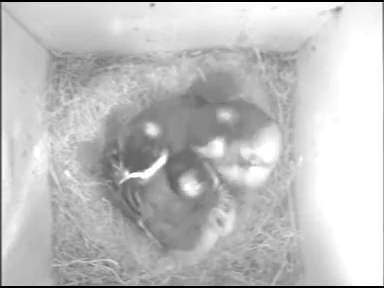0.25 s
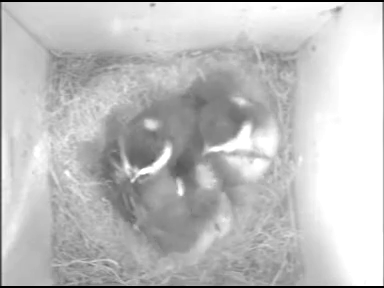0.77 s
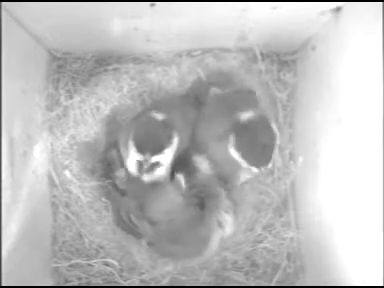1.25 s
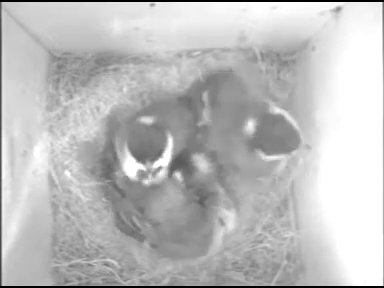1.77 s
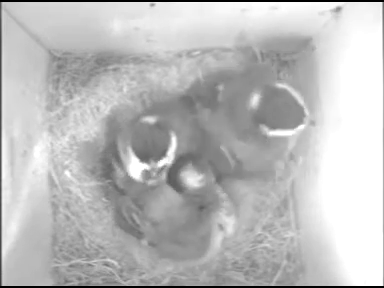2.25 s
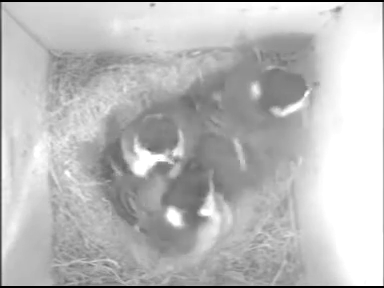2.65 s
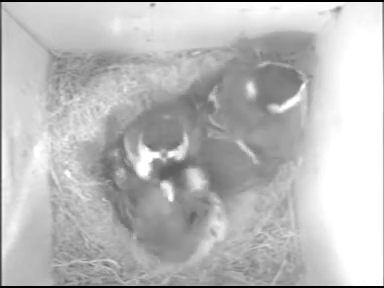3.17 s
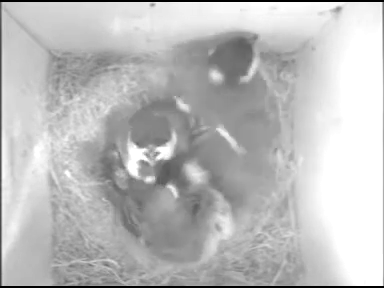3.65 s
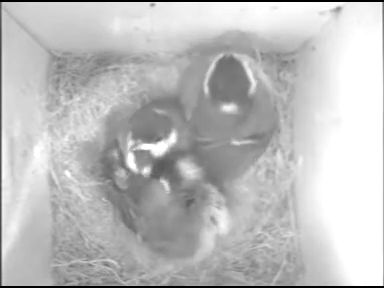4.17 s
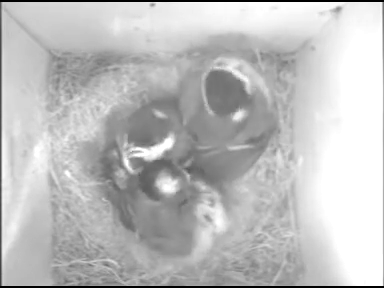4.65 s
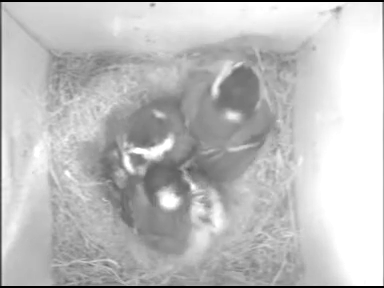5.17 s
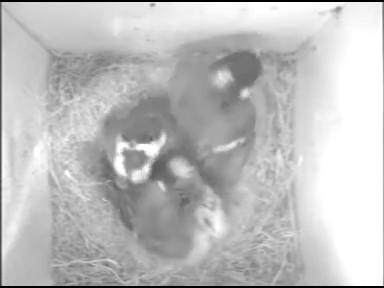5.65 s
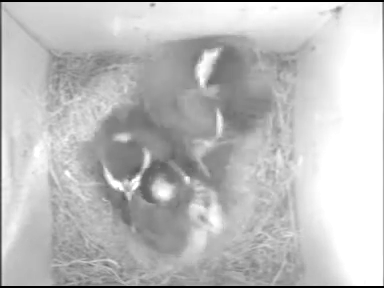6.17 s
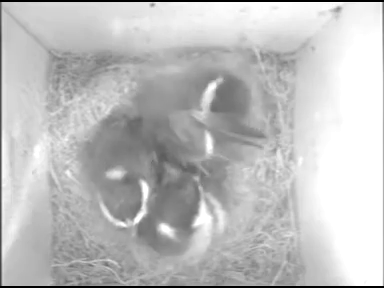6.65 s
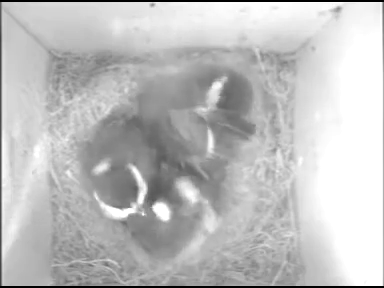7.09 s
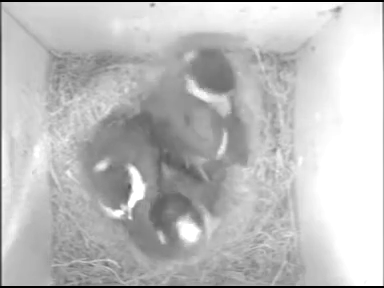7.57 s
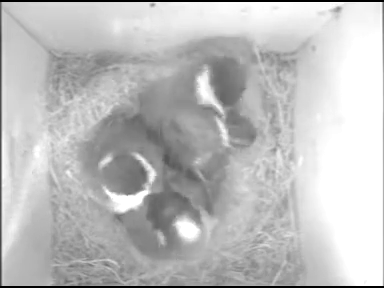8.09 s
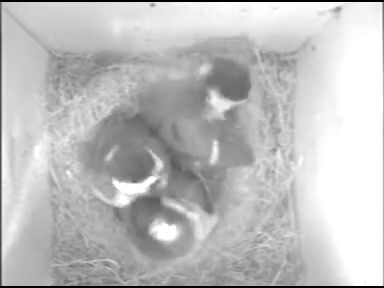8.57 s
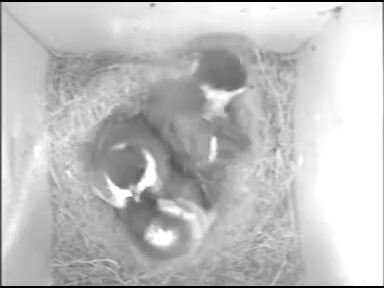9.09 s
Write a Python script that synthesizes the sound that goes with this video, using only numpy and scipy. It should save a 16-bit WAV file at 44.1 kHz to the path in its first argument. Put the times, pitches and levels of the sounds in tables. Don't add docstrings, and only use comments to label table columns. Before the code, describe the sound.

Inside a small wooden nest box, a very close microphone picks up a hungry nestling. Short rising peeps come in pairs and threes, then lengthen into flat, raspy cheeps, with brief pauses between runs. Low hum and soft hiss continue underneath. Bodies shift in the dry grass with a few dull thumps, and a far bird whistles very faintly outside.

```python
import sys
import numpy as np
from scipy import signal
from scipy.fft import rfft, irfft
from scipy.io import wavfile
from scipy.ndimage import uniform_filter1d, map_coordinates

SR = 44100
rng = np.random.default_rng(int(sys.argv[2]) if len(sys.argv) > 2 else 0)


def int16_out(signal):
    q = np.round(np.clip(np.atleast_2d(signal).T, -1, 1) * 32767)
    wavfile.write(sys.argv[1], SR, q.astype(np.int16))


def amplitude_ratio(level_db):
    exponent = np.asarray(level_db, float) / 20
    return 10 ** exponent


N = 411007

ONSET_S, ONSET_HZ, ONSET_DB = 0.010, 1904, -43.5
VOICE_HZ, VOICE_DB = 2114, -27.5
RELEASE_S, RELEASE_DB = 0.012, -47


def rms_one(x):
    return x / np.sqrt(np.mean(x ** 2) + 1e-20)


def drift(rate):
    knots = rng.standard_normal(4000)
    return map_coordinates(knots, [np.arange(N) * 2 * rate / SR], order=2)


def resonate(x, hz, width_hz):
    r = np.exp(-np.pi * width_hz / SR)
    poles = [1, -2 * r * np.cos(2 * np.pi * hz / SR), r * r]
    return signal.lfilter([(1 - r * r) / 2, 0, (r * r - 1) / 2], poles, x)


def circuit():
    # f/Hz, density/dB per Hz
    hiss_colour = [(35, -16.5), (70, -21), (110, -5.5), (190, -2.5), (330, -7), (820, -14), (2900, -32),
                   (4900, -30.5), (6000, -36.5), (11000, -48.5), (11700, -64)]
    # f/Hz, level/dB rms, wobble/dB
    hum_lines = [
        (50, -48.5, .9),
        (100, -49, 1.8),
        (150, -56, 2.5),
        (200, -58, 3),
        (250, -58, 3),
        (300, -57, 3),
    ]
    # f/Hz, level/dB rms
    whines = [
        (4947, -75),
        (9647, -85),
        (11025, -79),
        (12403, -86),
    ]
    t = np.arange(N) / SR
    hz = np.fft.rfftfreq(N, 1 / SR) + 1
    points = np.array(hiss_colour)
    colour = amplitude_ratio(np.interp(np.log(hz), np.log(points[:, 0]), points[:, 1]))
    hiss = rms_one(irfft(rfft(rng.standard_normal(N)) * colour, N))
    out = amplitude_ratio(-42 + 0.27 * drift(5.3)) * hiss
    for line_hz, db, wobble_db in hum_lines:
        phase = 2 * np.pi * line_hz * t + 6 * rng.random() + 0.17 * wobble_db * drift(9.5)
        out = out + np.sqrt(2) * amplitude_ratio(db + wobble_db * drift(11.0)) * np.sin(phase)
    for line_hz, db in whines:
        out = out + np.sqrt(2) * amplitude_ratio(db) * np.sin(2 * np.pi * line_hz * t)
    breath = resonate(rng.standard_normal(N), whines[0][0], 120)
    return out + amplitude_ratio(-69) * rms_one(breath)


def short_peep(s, length, climb, db, last_hz, knee_hz, share):
    flick_s, climb_db, climb_bow_hz, tire_db, last_db = 0.012, -23, 89.7, -1.5, -23.5
    clear = (.15, .5, .8, .45, .15)
    locked = (.1, .2, .05, .15, .2)
    end = length - RELEASE_S
    flick = max(end - flick_s, (climb + end) / 2)
    at = [ONSET_S, (ONSET_S + climb) / 2, climb, flick, end]
    mid_climb_hz = (VOICE_HZ + knee_hz) / 2 + climb_bow_hz
    hz = [VOICE_HZ, mid_climb_hz, knee_hz, knee_hz + share * (last_hz - knee_hz), last_hz]
    level = [VOICE_DB, min(climb_db, db), db, db + tire_db, last_db]
    onset = (s, ONSET_HZ, ONSET_DB, 0, 0)
    release = (s + length, last_hz, RELEASE_DB, 0, 0)
    return [onset, *zip(s + np.array(at), hz, level, clear, locked), release]


def long_peep(s, length, db, over_hz, held_hz):
    overshoot_s, settle_s, sag_s, sag_hz, sag_db = 0.025, 0.016, 0.014, 196.3, -8
    shoulder_s, shoulder_hz, shoulder_db = 0.006, 214, -0.5
    clear = (.35, .6, .28, .22, .15)
    locked = (.1, .05, .05, .1, .25)
    end = length - RELEASE_S
    at = [ONSET_S, overshoot_s, overshoot_s + settle_s, end - sag_s, end]
    settled_hz = 3080 + 0.4 * (over_hz - 3250)
    hz = [VOICE_HZ + shoulder_hz, over_hz, settled_hz, held_hz, held_hz - sag_hz / 2]
    level = [VOICE_DB, db - 3.0, db - 0.8, db, db + sag_db]
    points = [*zip(s + np.array(at), hz, level, clear, locked)]
    shoulder = (s + overshoot_s - shoulder_s, over_hz - shoulder_hz, db + shoulder_db, *points[1][3:])
    onset = (s, ONSET_HZ, ONSET_DB, 0, 0)
    release = (s + length, held_hz - sag_hz, RELEASE_DB, 0, 0)
    return [onset, points[0], shoulder, *points[1:], release]


def episodes(rows):
    t = np.arange(N) / SR
    return sum(share * np.clip(2 - 4 * np.abs(t - s) / length * 1.43, 0, 1) for s, length, share in rows)


def evened(x, ms):
    size = int(ms * SR / 1000)
    power = uniform_filter1d(uniform_filter1d(x ** 2, size), size)
    return x / np.sqrt(power + 1e-9)


def throat(pulses, gape):
    # f/Hz, width/Hz, level/dB
    throat_modes = [
        (2446, 2360, -21),
        (4177, 610, -14.5),
        (5010, 150, -11.5),
        (5676, 263, -4.5),
        (6813, 1400, -7.5),
        (8520, 1300, -15.5),
        (10370, 210, -19),
        (11330, 1000, -18),
        (13200, 230, -47.5),
    ]
    click = signal.unit_impulse(1024)
    click = click - 0.9 * resonate(click, hz=3550, width_hz=600)

    def steep(hz, width_hz, db):
        return amplitude_ratio(db) * resonate(resonate(click, hz, width_hz), hz, width_hz)

    shut = sum(steep(*mode) for mode in throat_modes)
    gaping = steep(hz=7558, width_hz=1290, db=0)
    return signal.oaconvolve(pulses, shut)[:N] + gape * signal.oaconvolve(pulses, gaping)[:N]


def nestling(fade_s=0.012, gape_db=14):
    # t/s, length/s, climb to the throat pitch/s, level/dB, last pulse rate f/Hz
    short_peeps = [ (0.608, .074, 0.049, -22.5, 2914), (.731, 0.073, 0.047, -20, 3080),
                   (1.293, 0.079, 0.043, -18, 2950), (1.944, .075, 0.031, -19.5, 2992),
                   (3.150, 0.082, 0.04, -16, 2950), (3.259, 0.073, 0.034, -15, 3240),
                   (4.802, 0.074, 0.053, -19, 2827), (4.932, 0.08, 0.041, -17.5, 3143),
                   (5.575, 0.083, .037, -15.5, 2968), (5.697, 0.087, 0.028, -16.5, 3019),
                   (6.883, .075, .046, -19, 2962), (7.002, 0.071, 0.039, -20, 3147),
                   (7.783, 0.082, .047, -16.5, 2893), (7.912, 0.082, 0.027, -19, 3098),
                   (8.754, 0.08, 0.037, -16, 3017), (8.888, 0.081, .027, -15.5, 3126)]
    # t/s, length/s, climb/s, level/dB, last pulse rate f/Hz
    stepped_peeps = [
        (1.439, 0.084, 0.032, -18, 3040),
        (2.082, 0.087, 0.031, -18.5, 3256),
        (3.378, .079, .032, -17, 3331),
        (7.145, 0.084, 0.029, -20, 3270),
    ]
    # t/s, length/s, level/dB, overshoot f/Hz, held f/Hz
    long_peeps = [ (2.284, 0.13, -17, 3238, 3231), (2.486, 0.13, -16, 3393, 3114),
                  (2.706, 0.12, -17.5, 3232, 3080), (3.560, 0.11, -17.5, 3133, 3160),
                  (3.788, 0.11, -16.5, 3078, 3165), (3.971, 0.13, -16, 3164, 3092),
                  (4.165, .124, -17, 3335, 3166), (5.849, .115, -16, 3125, 3149),
                  (6.038, .136, -15, 3323, 3044), (6.254, .124, -19.5, 3378, 3060),
                  (8.078, 0.11, -20, 3166, 3129), (9.056, .100, -17.5, 3093, 3124),
                  (9.262, .110, -17, 3210, 3210)]
    # middle t/s, length/s, share/0-1
    tripled = [(.648, .04, .55), (.772, .03, .4), (1.345, .03, .3), (1.482, .04, .6), (1.988, .035, .45),
               (2.125, .05, .6), (2.375, .03, .3), (2.512, .025, .4), (2.728, .015, .4), (3.200, .03, .25),
               (3.310, .02, .3), (3.425, .04, .7), (4.190, .015, .5), (4.840, .035, .55),
               (4.982, .025, .35), (5.635, .02, .3), (5.740, .03, .35), (5.940, .015, .4),
               (6.065, .015, .5), (6.935, .025, .45), (7.040, .04, .35), (7.200, .035, .5),
               (7.845, .025, .5), (7.977, .02, .4), (8.164, .02, .4), (8.930, .04, .3)]
    # middle t/s, length/s, share/0-1
    doubled = [
        (2.322, .015, .6),
        (2.803, .015, .4),
        (3.599, .02, .8),
        (3.822, .03, .35),
        (4.030, .015, .3),
        (6.335, .015, .3),
        (8.803, .015, .4),
    ]
    # middle t/s, length/s, share lost/0-1
    hoarse = [(1.510, 0.033, .8), (2.770, 0.067, 0.68), (1.6, 0.083, 0.87), (4.040, 0.22, 0.47),
              (4.240, .08, 0.79), (2.5, 0.031, 0.84), (2.560, .08, 0), (6.110, .06, 0.32),
              (7.185, 0.029, 0.4), (6.275, 0.011, 0.4), (5.770, 0.019, .7), (9.120, .05, 0)]

    peeps = [short_peep(*p, knee_hz=2793, share=0.59) for p in short_peeps]
    peeps += [short_peep(*p, knee_hz=2950, share=0.362) for p in stepped_peeps]
    peeps += [long_peep(*p) for p in long_peeps]
    turns = []
    for p in sorted(peeps):
        before = (p[0][0] - fade_s / 2, p[0][1], -85, 0, 0)
        after = (p[-1][0] + 2 * fade_s, p[-1][1], -85, 0, 0)
        turns.append([before, *p, after])
    s, *columns = np.concatenate(turns).T
    t = np.arange(N) / SR
    hz, level_db, clear, locked = [np.interp(t, s, c) for c in columns]

    gape = amplitude_ratio(gape_db * np.clip((hz - 3050) / 700, -1, 0) + 0.5 * np.minimum(level_db + 18.0, 0))
    cycles = np.cumsum(hz * (1 + 0.003 * drift(150))) / SR
    pulse = ((1 + np.cos(2 * np.pi * cycles)) / 2) ** 8
    number = np.round(cycles).astype(int)

    every = 3 - (episodes(doubled) > 0)
    stress = np.cos(2 * np.pi * number / every + 1.3)
    locked = np.maximum(locked, 0.65 * episodes(tripled) + 0.8 * episodes(doubled))
    clear = np.minimum(clear * (1 - episodes(hoarse)), 0.95 - locked)
    chance = signal.lfilter([1, -.5], [1, .65, .42], rng.uniform(-1, 1, 40000))[number]
    overtones_db = (-2, 0, -15, -18)
    whistle = sum(amplitude_ratio(db) * np.cos(2 * np.pi * (k + 1) * cycles) for k, db in enumerate(overtones_db))

    voiced = np.clip((level_db + 38) / 12, 0, 1)
    clear = voiced * np.clip(clear, 0, 1)
    locked = voiced * np.clip(locked, 0, 1)
    rasp = np.clip(1 - clear - locked, 0.03, 1)
    voice = np.sqrt(clear) * evened(throat(whistle, gape), ms=1.8) * amplitude_ratio(2.5 * drift(70))
    voice = voice + np.sqrt(locked) * evened(throat(pulse * stress, gape), ms=3) * amplitude_ratio(1.5 * drift(200))
    voice = voice + np.sqrt(rasp) * evened(throat(pulse * chance, gape), ms=5)
    return amplitude_ratio(level_db + 1.25) * voice


def box(x, t60=0.029, wet_db=-22):
    t = np.arange(int(0.12 * SR)) / SR
    tail = rng.standard_normal(len(t)) * amplitude_ratio(-60 * t / t60)
    return x + amplitude_ratio(wet_db) * signal.fftconvolve(x, tail / np.linalg.norm(tail))[:N]


def swell(s, length):
    return np.exp(-0.5 * ((np.arange(N) / SR - s) / (length / 3)) ** 2)


def far_bird():
    # t/s, length/s, start f/Hz, end f/Hz, level/dB
    whistles = [
        (0.89, .1, 5620, 5500, -62),
        (1.54, .13, 5900, 5800, -60),
        (1.53, .08, 5550, 5450, -63),
        (1.66, .07, 5000, 4100, -66),
        (2.43, .06, 5500, 5500, -60),
        (7.45, .09, 5450, 5400, -64),
        (8.02, .06, 5700, 6000, -66),
    ]
    t = np.arange(N) / SR
    out = 0
    for s, length, start_hz, end_hz, db in whistles:
        cycles = start_hz * (t - s) + (end_hz - start_hz) * (t - s) ** 2 / (2 * length)
        out = out + amplitude_ratio(db) * swell(s + length / 2, length) * np.sin(2 * np.pi * cycles)
    return amplitude_ratio(5 * drift(90)) * out


def rustle():
    shifts = [
        (1.795, 0.073, 394, -40),
        (2.007, 0.053, 417, -30.5),
        (2.913, 0.68, 689, -49.5),
        (3.706, 0.059, 795.5, -41.5),
        (6.26, 0.079, 295.4, -34),
        (8.5, 0.051, 7365, -60.5),
    ]
    grains = rng.standard_normal(N) * amplitude_ratio(3 * drift(200))
    out = 0
    for s, length, hz, db in shifts:
        grass = resonate(resonate(grains, hz, hz), hz, hz)
        out = out + amplitude_ratio(db) * swell(s, length) * rms_one(grass)
    return out


def scene():
    air = box(nestling()) + far_bird() + rustle()
    squared = np.abs(air) ** 2
    band = signal.butter(1, [330, 2000], "band", fs=SR, output="sos")
    bend = signal.sosfilt(band, squared) + 0.34 * resonate(squared, 370, 460)
    mid = air - 3.0 * bend + circuit()
    side_hum = amplitude_ratio(-74) * np.sin(2 * np.pi * 50 * np.arange(N) / SR)
    side = amplitude_ratio(-29) * air * drift(40) + side_hum
    return np.array([mid + side, mid - side])


def top_cut(x):
    return signal.sosfilt(signal.butter(12, 13540, fs=SR, output="sos"), x)


def record(dry):
    rounded = dry / (1 + (dry / 0.85) ** 6) ** (1 / 6)
    low_pass = signal.ellip(9, 0.5, 60, 12950, fs=SR, output="sos")
    cut = signal.sosfilt(low_pass, rounded)
    return top_cut(cut)


dry = scene()
out = record(dry)
int16_out(out)
```